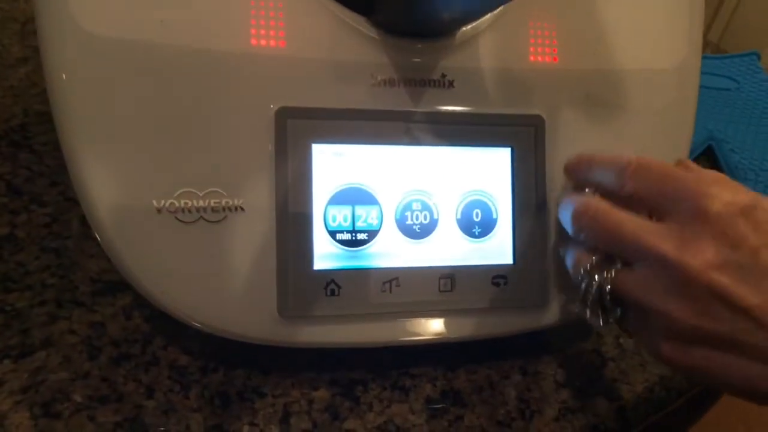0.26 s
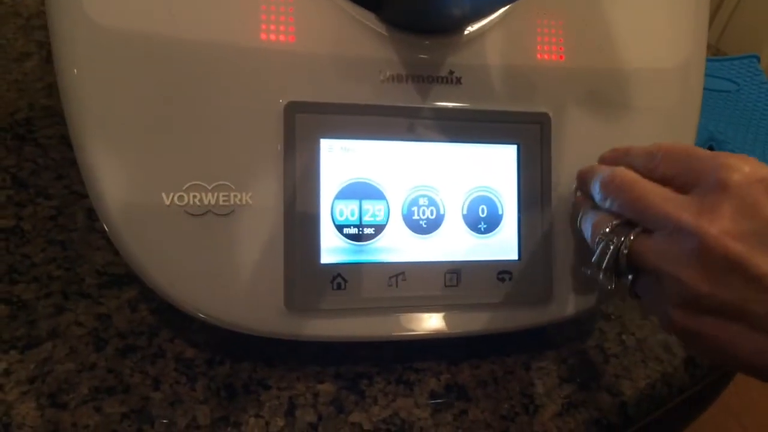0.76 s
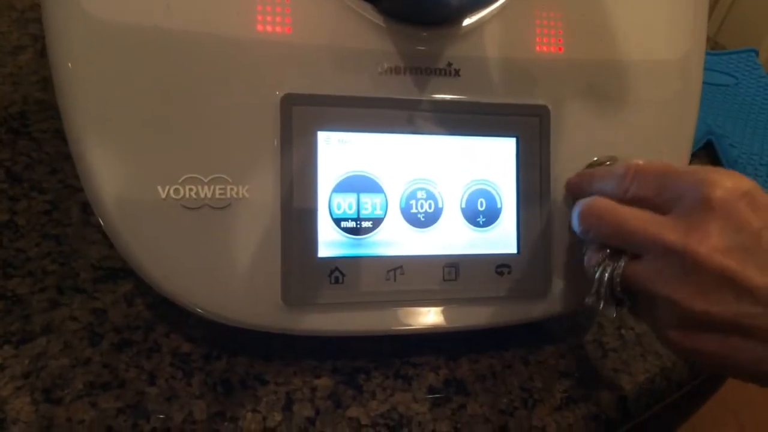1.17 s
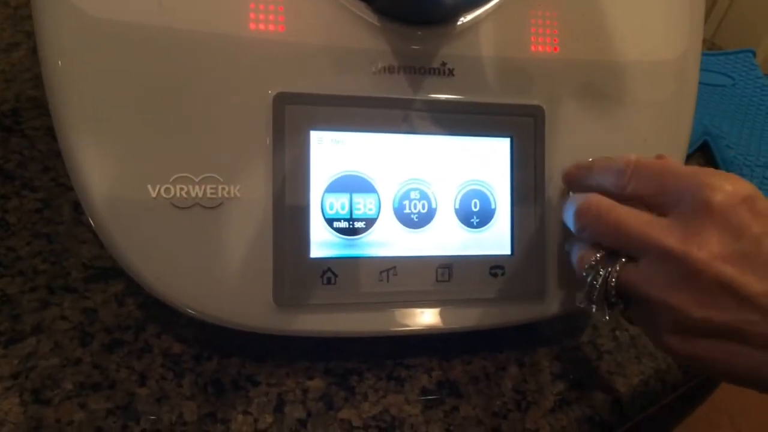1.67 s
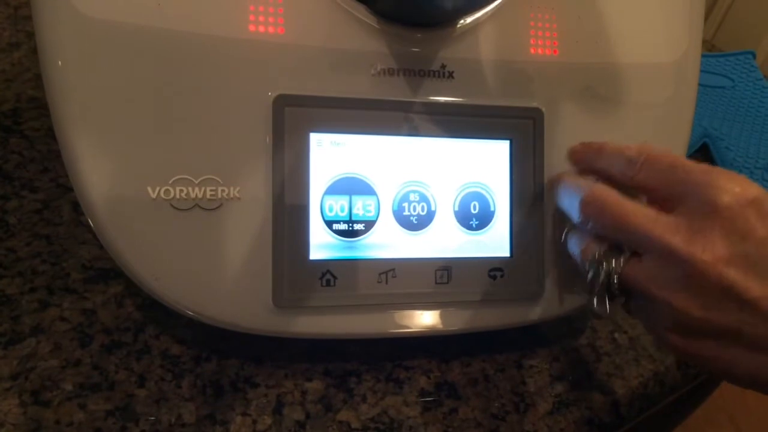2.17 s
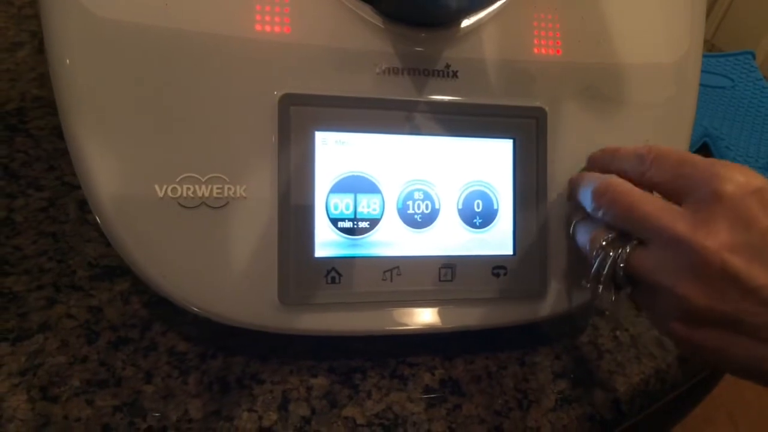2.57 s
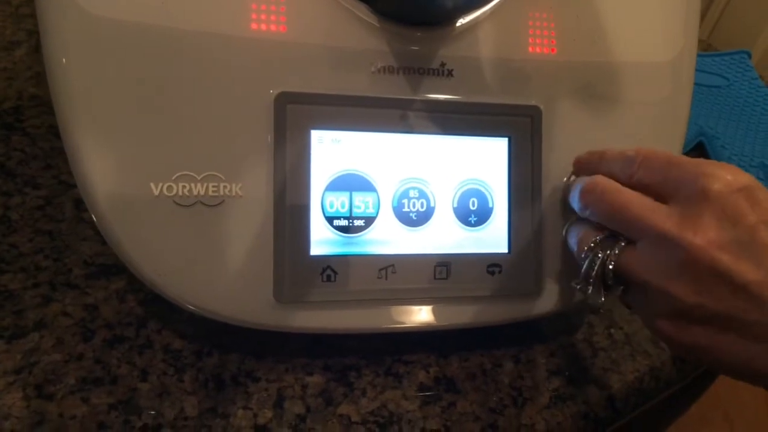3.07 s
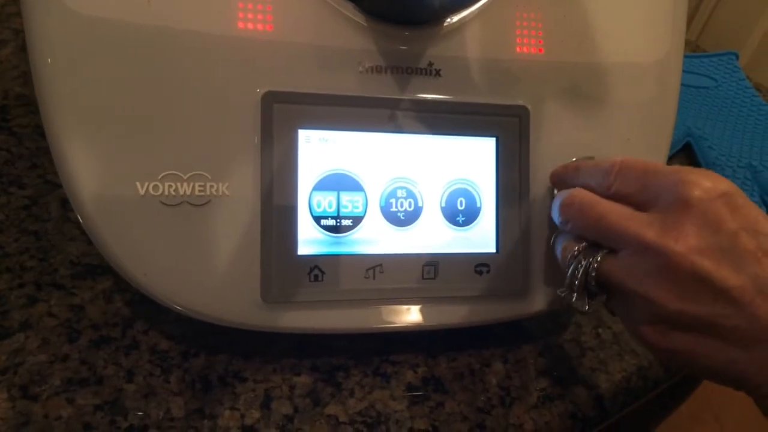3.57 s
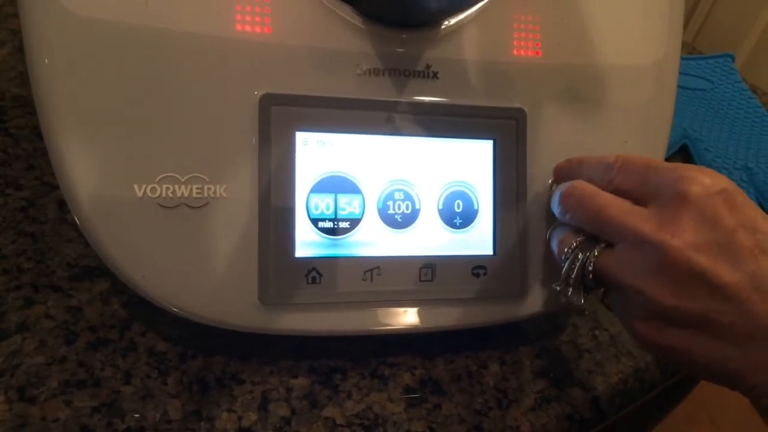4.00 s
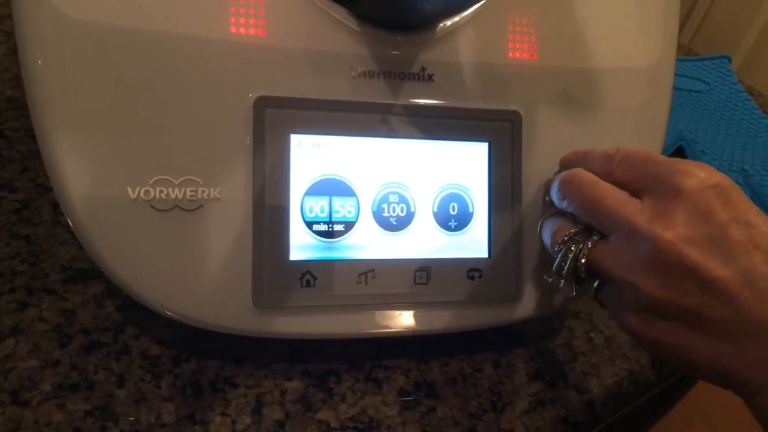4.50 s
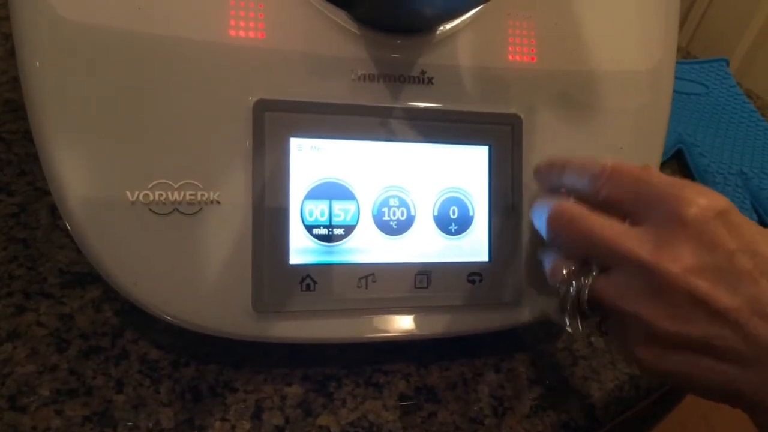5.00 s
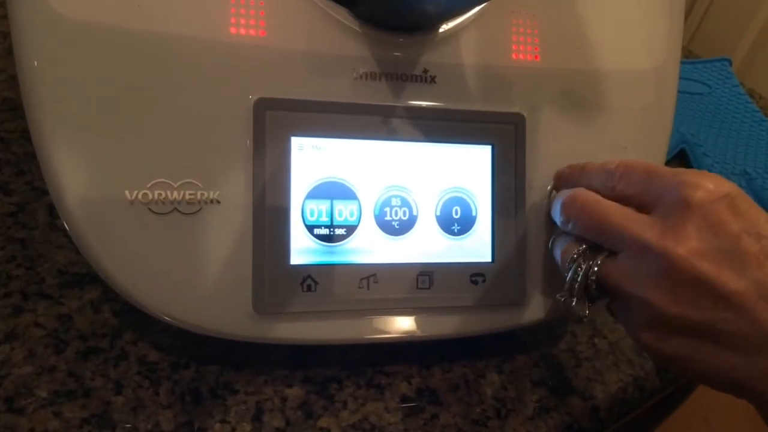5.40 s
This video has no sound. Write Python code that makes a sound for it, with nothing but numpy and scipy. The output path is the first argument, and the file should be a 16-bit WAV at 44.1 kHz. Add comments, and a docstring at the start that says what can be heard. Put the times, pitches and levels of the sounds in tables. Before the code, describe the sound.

Close ratcheting clicks from an appliance knob, first a rapid burst, then irregular small groups and single clicks, in a quiet room.

```python
"""Detent dial in a small kitchen

A hand turns the detent dial of a countertop kitchen appliance in short runs, heard close by. At each notch a
spring scrapes up a tooth, snaps down and chatters, an impulsive force that excites modes of a plastic housing.
Noise bursts make the soft knocks and ticks of the gripping fingers, and grainy noise the rub of the dial.
Echoes off the counter and diffuse decays of the kitchen answer, over faint mains hum and filtered hiss."""
import sys
import numpy as np
from scipy import signal
from scipy.fft import rfft, irfft, next_fast_len
from scipy.io import wavfile

SR = 44100
rng = np.random.default_rng(int(sys.argv[2]) if len(sys.argv) > 2 else 0)


def generate_wav(signal):
    """Clip the signal to [-1, 1] and save it as 16-bit WAV at the path in sys.argv[1]."""
    frames = np.transpose(np.atleast_2d(signal))
    scaled = np.clip(frames, -1, 1) * 32767
    pcm = np.round(scaled).astype(np.int16)
    wavfile.write(sys.argv[1], SR, pcm)


N = 248944

# notches of the dial: (snap time [s], strength [dB], brightness [dB per octave], chatter time [s],
# tooth pitch [Hz], tooth ring before the strength is applied [dB])
NOTCHES = [(0.0272, -41, -0.5, .0026, 3520, -8), (0.051, -42.5, -1, 0.0041, 3620, -2),
           (0.0699, -40.5, -1, 0.0058, 4060, 0), (0.0882, -37, 0.1, 0.0025, 2000, -1.5),
           (0.1103, -47.5, 1, .0042, 4920, -12), (0.6375, -53, .5, .0033, 8400, -3),
           (.7425, -50, 2, 0.0044, 8140, -3), (0.807, -46.5, 1.5, .0034, 3640, 1),
           (.9443, -43, -1.45, 0.004, 5760, -5.5), (1.3465, -47.5, 0, .004, 3700, -4.5),
           (1.397, -45, 0, .0054, 6950, -10), (1.4434, -43.5, 0, 0.0048, 2780, -6),
           (1.5362, -40, .5, .0017, 2650, -2), (1.925, -45.5, 0, 0.004, 3080, 0),
           (2.0014, -45, 0.5, 0.0041, 2380, -3.5), (2.0673, -42, -0.3, .0043, 2100, -2.5),
           (2.4981, -46.5, -.5, 0.0039, 2210, -9.5), (2.5438, -47, 1.5, 0.0045, 4130, -16),
           (2.611, -42.5, 0.2, .0038, 2660, 0.5), (3.0117, -42.5, 1, 0.0051, 2390, -6.5),
           (3.0913, -44, 0, .0033, 6120, -1), (3.1942, -41.5, .5, 0.0045, 2510, -1.5),
           (3.6938, -38.5, 0, 0.0046, 2770, -5.5), (4.133, -41.5, -1.2, 0.0048, 2470, -3),
           (4.4276, -45.5, -0.4, .0018, 2440, 0.5), (4.757, -52, 1, .0022, 8240, -4),
           (5.2599, -50.5, 1, 0.0031, 5850, -3.5), (5.385, -47.5, 2, 0.0048, 8170, -14)]
# lower edges of the thud, body, snap, bite and top ranges: (frequency [Hz])
RANGE_EDGES = (165, 600, 1800, 3500, 7000)
# modes of the housing: (nominal frequency [Hz], relative level [dB], decay time t60 [s])
HOUSING_MODES = [(260.5, -13.5, 0.079), (375.6, -8.5, 0.13), (520.4, -11, 0.051), (770, -1.5, 0.069),
                 (1005, -11.5, 0.13), (1114.5, -5, 0.092), (1295, -7.5, .08), (1455, -1.5, 0.053),
                 (1730, -9.5, 0.053), (1970, -7, 0.068), (2210, -2.5, 0.068), (2420, 0.5, 0.042),
                 (2773, 5, 0.026), (3370, -1, 0.046), (4143, -2, 0.03), (5910, -6, 0.027), (6690, -3, .016),
                 (8320, 5.5, 0.014), (9350, -2, 0.011)]
# spectrum of the dense ring of the small plastic parts: (frequency [Hz], relative level [dB])
PLASTIC_SPECTRUM = [(150, -7), (300, -9.5), (900, -5), (2600, 1.5), (4200, -2), (5100, -4), (6100, -4),
                    (7500, -8), (8300, -1), (10000, 2), (11700, -13), (14500, -11), (16000, -40.5)]
# fingers taking a new grip: (time [s], knock level [dB], knock pitch [Hz], tick level [dB])
GRIPS = [(0.035, -50.5, 260, -68), (0.199, -75, 250, -67.5), (0.431, -71, 170, -73.5),
         (0.771, -60.5, 150, -78), (1.187, -64, 240, -77.5), (1.283, -67, 250, -75),
         (1.377, -55.5, 320, -69), (1.778, -63, 250, -75.5), (1.859, -70, 250, -75),
         (2.404, -62, 199, -67.5), (2.904, -65.5, 342, -67.5), (3.569, -70, 250, -68),
         (5.186, -69, 276, -79)]
# spectrum of a fingertip's knock at average pitch: (frequency [Hz], relative level [dB])
KNOCK_SPECTRUM = [(80, -24), (180, -1.5), (350, -7), (550, -10), (900, -17), (2000, -53), (8000, -51)]
# spectrum of the tick of the dial's play, also of its rubbing: (frequency [Hz], relative level [dB])
TICK_SPECTRUM = [(300, -26), (800, 0.5), (2600, 2.5), (4500, 1.5), (7000, -4.5), (9000, 1), (12000, -13.5),
                 (16000, -16)]
# bands of the kitchen's answer: (centre frequency [Hz], relative level [dB], tail decay time t60 [s])
KITCHEN_BANDS = [(108.7, -21, .4), (197, -3.5, 0.37), (503, -2.5, 0.45), (1070, -7, 0.52),
                 (1680, -10.5, 0.53), (2630, -14.5, 0.5), (4185, -12, 0.37), (5300, -10.5, 0.3),
                 (7700, -11, 0.14), (8400, -9.5, 0.29), (10300, -15.5, 0.3), (11530, -14.5, 0.26),
                 (14800, -11, 0.27)]
# spectrum of the room air and hiss: (frequency [Hz], relative level [dB])
AIR_SPECTRUM = [(15, -69), (25, -20), (129, 1.5), (173, -6.5), (378, -10.5), (445, -12), (582, -14),
                (848, -14.5), (919, -15), (1140, -19), (1530, -19.5), (1800, -22), (6920, -28), (8810, -24),
                (15500, -29)]
# partials of the mains hum: (frequency [Hz], mean peak level [dB])
HUM_PARTIALS = [(60, -99), (119.9, -72.5), (240, -101.5)]
# swells of grainy noise: a short one that opens the scene (first row), then the dial and skin on its rim
# sliding, # loudest in the first fast spin: (start time [s], length [s], rms level at the crest of the swell
# [dB])
RUBS = [(0.0, 0.02, -56), (0.043, 0.11, -41), (0.364, 0.073, -75), (0.48, 0.13, -77), (1.156, 0.081, -74),
        (1.843, 0.22, -68), (2.44, 0.081, -74), (4.928, 0.089, -79.5), (5.584, 0.081, -78.5)]
# colour of the echoes off the counter: (frequency [Hz], relative level [dB])
COUNTER_SPECTRUM = [(150, 4), (400, -0.5), (1100, 1), (2500, 0.5), (4300, -7.5), (7000, -10), (9000, 1),
                    (14000, -1)]
# tone shared by all clicks, as thud, body, snap, bite and top: (centre frequency [Hz], relative level [dB])
CLICK_TONE = [(380, -16.5), (1040, -8), (2500, -5.5), (5000, -4), (10000, -4.5)]

AIR_DB = -69.5  # rms
TOP_HZ = 15400
CLICK_SIZE, LEAD_SIZE = 4096, 512  # samples in a click, and those before its snap
PIVOT_HZ = 2460  # a harder, brighter snap tilts the tone about this frequency
THUD_DB_PER_SPEED = 0.1249  # a faster spin knocks the housing harder: dB per notch a second
KNOCK_HZ = 250  # average knock pitch; a firmer touch shifts its whole spectrum up


def undb(db):
    """Logarithmic level: decibels become an amplitude ratio."""
    return 10 ** (np.asarray(db) / 20)


def fade(t, t60):
    """Exponential damping: the level falls 60 dB in t60 seconds."""
    return np.exp(-np.log(1000) * t / t60)


def level(x, db):
    """Energy equivalence: a short sound gets the energy of 20 ms at the given rms level."""
    rms_over_20_ms = np.sqrt(np.sum(x ** 2) / (.02 * SR))
    return x * undb(db) / rms_over_20_ms


def along(points, size, column=1):
    """Logarithmic frequency scale: a table column is interpolated at the bins of a transform."""
    table = np.array(points, float)
    hz = np.maximum(np.fft.rfftfreq(size, 1 / SR), 1)
    return np.interp(np.log(hz), np.log(table[:, 0]), table[:, column])


def colour(x, points):
    """Minimum phase: folding the cepstrum makes a causal filter of the given (Hz, dB) spectrum."""
    size = 2 * next_fast_len(len(x))
    log_gain = np.log(undb(along(points, size)))
    cepstrum = irfft(log_gain)
    cepstrum[1:size // 2] *= 2
    cepstrum[size // 2 + 1:] = 0
    response = np.exp(rfft(cepstrum))
    return irfft(rfft(x, size) * response)[:len(x)]


def split(x, edges_hz, order=4):
    """Band division: differences of zero-phase low-passes give the ranges above each edge."""
    lows = []
    for hz in edges_hz:
        low_pass = signal.butter(order, hz, fs=SR, output="sos")
        lows.append(signal.sosfiltfilt(low_pass, x, padtype=None))
    return np.diff(lows + [x], axis=0)


def diffuse(x, decay):
    """Incoherent superposition: many paths of unrelated phase make noise of x's energy, smeared over the decay."""
    energy = signal.fftconvolve(x ** 2, decay ** 2 / np.sum(decay ** 2))[:len(x)]
    return np.sqrt(np.maximum(energy, 0)) * rng.standard_normal(len(x))


def add(out, x, start):
    """Linear superposition: a sound is summed in from the given sample on."""
    start = max(start, 0)
    out[start:start + len(x)] += x[:N - start]


def background(waver_db=0.6):
    """Stationary noise and periodic hum: filtered room air and hiss, with mains partials that waver slightly."""
    t = np.arange(N) / SR
    air = colour(rng.standard_normal(N), AIR_SPECTRUM)
    knots = np.linspace(0, t[-1], 24)
    waver = np.interp(t, knots, rng.standard_normal(len(knots)))
    hum = sum(undb(db) * np.sin(2 * np.pi * (hz * t + rng.random())) for hz, db in HUM_PARTIALS)
    return air / air.std() * undb(AIR_DB) + hum * undb(waver_db * waver)


def rubbing(grain_db=3.5, grain_size=64):
    """Stick-slip friction: sliding surfaces catch and slip, noise of stepwise random level that swells and dies."""
    swells = np.zeros(N)
    for s, length_s, db in RUBS:
        add(swells, undb(db) * np.hanning(int(length_s * SR)), int(s * SR))
    grain_levels_db = grain_db * rng.standard_normal(N // grain_size + 1)
    catches = np.repeat(undb(grain_levels_db), grain_size)[:N]
    friction = colour(catches * rng.standard_normal(N), TICK_SPECTRUM)
    return swells * friction / friction.std()


def spring(chatter_s, bounce_db=-5.5, slide_db=-6.5, slide_s=0.0017, count=5):
    """Impulsive excitation: the detent spring's swelling scrape up the tooth, its snap, then a few uneven bounces."""
    t = (np.arange(CLICK_SIZE) - LEAD_SIZE) / SR
    scrape = rng.standard_normal(CLICK_SIZE) * (t < 0) * np.exp(-abs(t) / slide_s)
    force = undb(slide_db) * scrape / np.linalg.norm(scrape)
    force[LEAD_SIZE] += 1  # the snap
    when, size = rng.random((count, 2)).T
    delays_s = (np.arange(count) + when) / count * chatter_s
    bounces = LEAD_SIZE + (delays_s * SR).astype(int)
    force[bounces] += undb(bounce_db) * (.5 + size) * rng.choice([-1, 1], count)
    return force


def housing(force, modes_db=-1.0, ring_t60=.014, detune=0.0026):
    """Modal superposition: the force excites modes, a little different at each notch, and a dense short ring."""
    t = np.arange(CLICK_SIZE) / SR
    hz, db, t60 = np.transpose(HOUSING_MODES)[:, :, None]
    shift, sign = rng.standard_normal((len(HOUSING_MODES), 2)).T[:, :, None]
    # dividing by the root of t60 gives long and short modes comparable energy
    strength = undb(db) / np.sqrt(t60) * np.sign(sign)
    modes = strength * fade(t, t60) * np.sin(2 * np.pi * hz * (1 + detune * shift) * t)
    body = signal.fftconvolve(force, modes.sum(0))[:CLICK_SIZE]
    ring = colour(diffuse(force, fade(t, ring_t60)), PLASTIC_SPECTRUM)
    return level(body, modes_db) + level(ring, 0)


def tooth(hz, ring_t60=0.0097):
    """Damped free vibration: the struck tooth rings briefly at its own pitch."""
    t = np.maximum(np.arange(CLICK_SIZE) - LEAD_SIZE, 0) / SR
    return np.sin(2 * np.pi * hz * t) * fade(t, ring_t60)


def spin_speed():
    """Rate as inverse interval: notches a second, from the time to the nearest other notch."""
    gaps = np.diff(np.transpose(NOTCHES)[0], prepend=-np.inf, append=np.inf)
    return 1 / np.minimum(gaps[:-1], gaps[1:])


def voiced(click, brightness_db, speed):
    """Spectral tilt: a harder snap is brighter about the pivot, and a faster spin has more thud."""
    hz, db = np.transpose(CLICK_TONE)
    db = db + brightness_db * np.log2(hz / PIVOT_HZ)
    db[0] += THUD_DB_PER_SPEED * speed
    parts = split(click, RANGE_EDGES)
    return sum(level(part, part_db) for part, part_db in zip(parts, db))


def dial():
    """Source and resonator: at every notch the spring drives the housing, and the tooth adds its own pitch."""
    out = np.zeros(N)
    for notch, speed in zip(NOTCHES, spin_speed()):
        s, strength_db, brightness_db, chatter_s, pitch_hz, ring_db = notch
        click = voiced(housing(spring(chatter_s)), brightness_db, speed)
        click = click + level(tooth(pitch_hz), ring_db)
        add(out, undb(strength_db) * click, int(s * SR) - LEAD_SIZE)
    return out


def fingers(knock_t60=0.087, tick_t60=0.021):
    """Damped impact: a soft fingertip gives a dull noise burst, and the dial's play a shorter, brighter tick."""
    out, t = np.zeros(N), np.arange(CLICK_SIZE) / SR
    for s, knock_db, knock_hz, tick_db in GRIPS:
        spectrum = [(hz * knock_hz / KNOCK_HZ, db) for hz, db in KNOCK_SPECTRUM]
        knock = colour(rng.standard_normal(CLICK_SIZE) * fade(t, knock_t60), spectrum)
        tick = colour(rng.standard_normal(CLICK_SIZE) * fade(t, tick_t60), TICK_SPECTRUM)
        add(out, level(knock, knock_db) + level(tick, tick_db), int(s * SR))
    return out


def kitchen(x, first_s=0.008, near_t60=0.062, near_db=-0.5, far_db=-1.5):
    """Diffuse reverberation: cupboard reflections and the room's tail decay at a rate set by the band."""
    size = next_fast_len(N, True)
    t = np.arange(SR // 2) / SR
    arrival = np.clip(2 * t / first_s - 1, 0, 1)  # rises from half of first_s to full at first_s
    centres = np.transpose(KITCHEN_BANDS)[0]
    spectrum, out = rfft(x, size), 0
    for k, (_, db, t60) in enumerate(KITCHEN_BANDS):
        near, far = arrival * fade(t, near_t60), arrival * fade(t, t60)
        near = undb(near_db) * near / np.linalg.norm(near)
        far = undb(far_db) * far / np.linalg.norm(far)
        decay = np.hypot(near, far)
        # each band gives back the energy that the sound put into it
        band_energy = along(list(zip(centres, np.arange(len(centres)) == k)), size)
        band = np.sqrt(band_energy)
        echo = diffuse(irfft(spectrum * band, size), decay)
        out = out + undb(db) * rfft(echo) * band / np.sqrt(np.mean(band ** 2))
    return irfft(out, size)[:N]


def counter(x, first_s=0.0068, echo_t60=0.13, echo_db=-14):
    """Multiple reflection: fixed echoes between stone top, housing and wall behind leave a faint hollow ring."""
    t = np.arange(2 * CLICK_SIZE) / SR
    echoes = rng.standard_normal(len(t)) * fade(t, echo_t60) * (t > first_s)
    echoes = undb(echo_db) * echoes / np.linalg.norm(echoes)
    return signal.fftconvolve(x, colour(echoes, COUNTER_SPECTRUM))[:N]


def scene(room_db=-2.5):
    """Superposition of paths: dial and fingers direct, off the counter and through the kitchen, over the background."""
    near = dial() + fingers() + rubbing()
    return (near + counter(near) + undb(room_db) * kitchen(near) + background())[None]


def record(dry):
    """Band limitation: a steep elliptic low-pass cuts the top."""
    low_pass = signal.ellip(8, .2, 70, TOP_HZ, fs=SR, output="sos")  # 0.2 dB ripple, 70 dB stop band
    return signal.sosfilt(low_pass, dry)


dry = scene()
out = record(dry)
generate_wav(out)
```